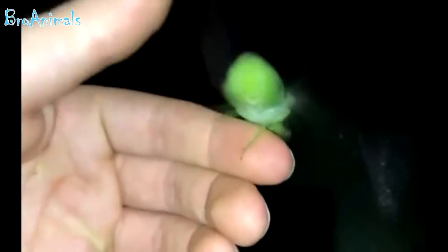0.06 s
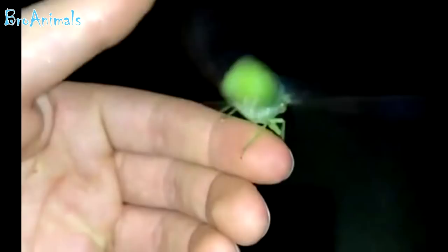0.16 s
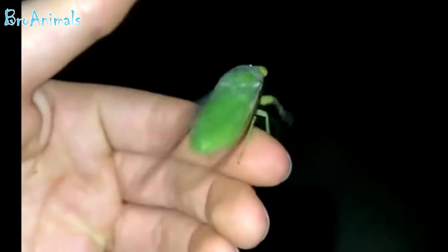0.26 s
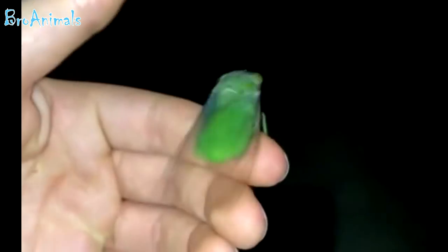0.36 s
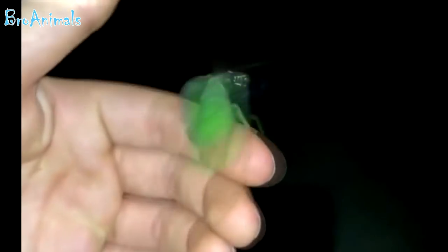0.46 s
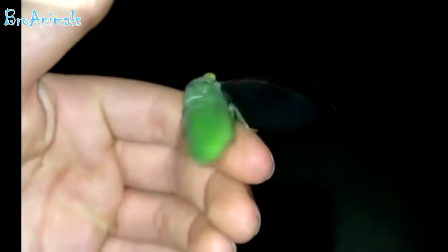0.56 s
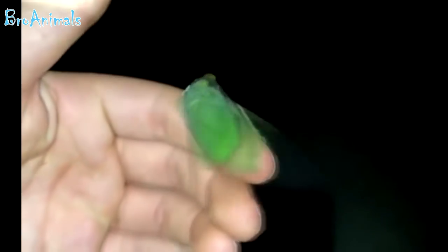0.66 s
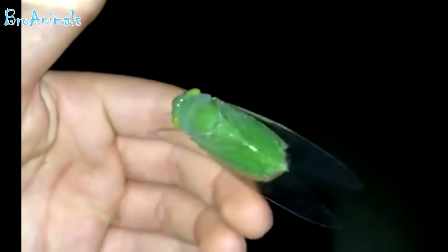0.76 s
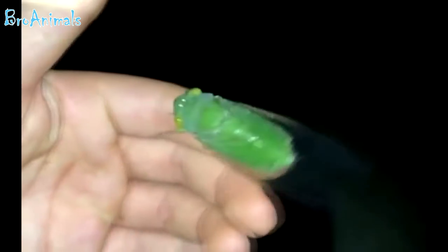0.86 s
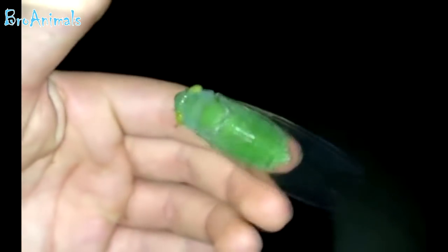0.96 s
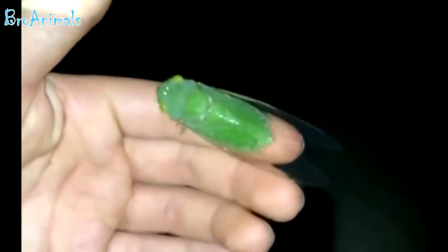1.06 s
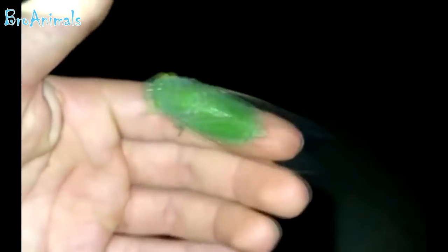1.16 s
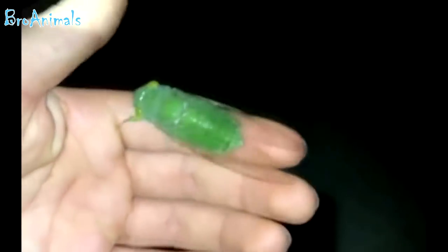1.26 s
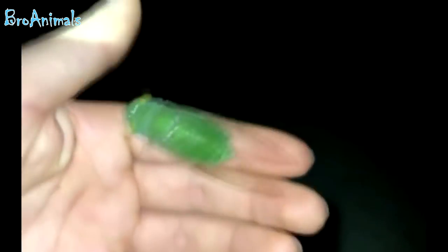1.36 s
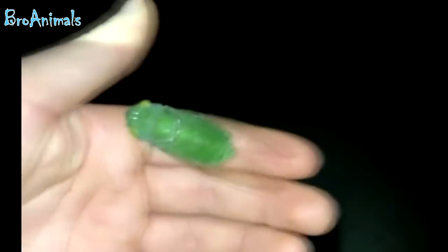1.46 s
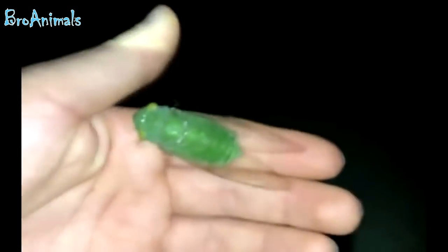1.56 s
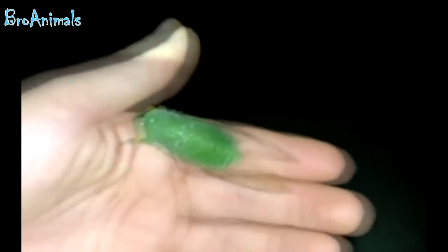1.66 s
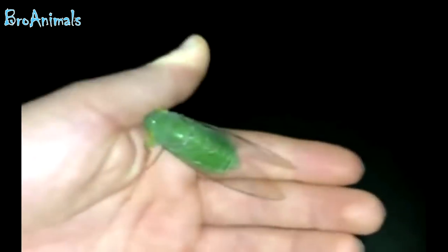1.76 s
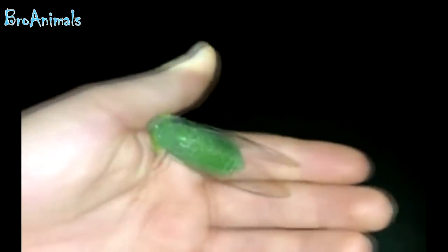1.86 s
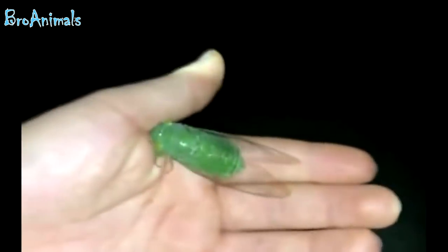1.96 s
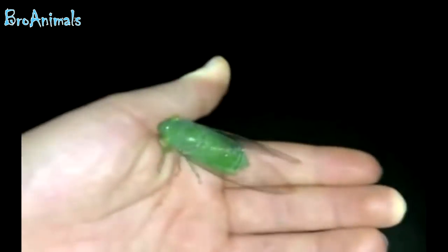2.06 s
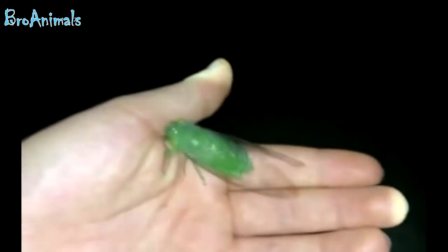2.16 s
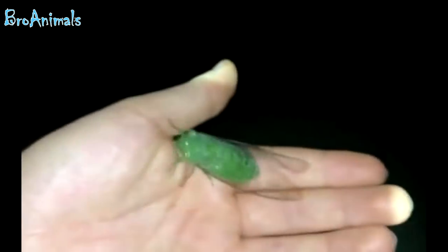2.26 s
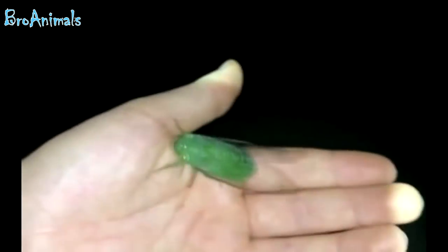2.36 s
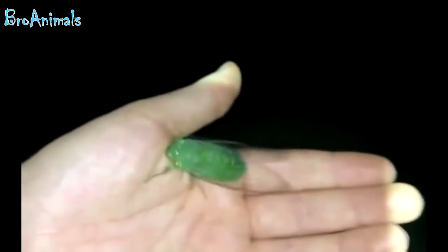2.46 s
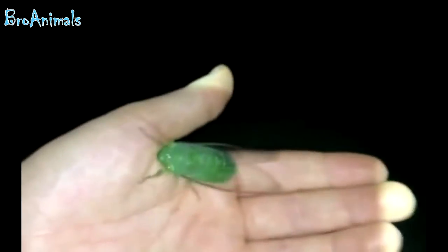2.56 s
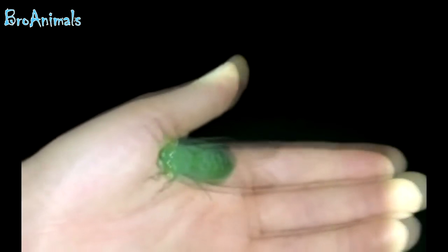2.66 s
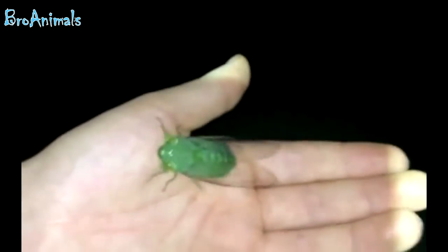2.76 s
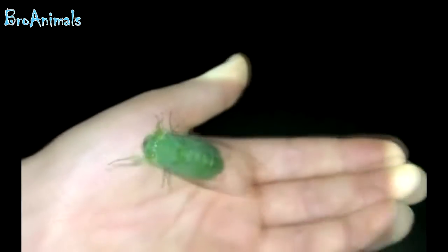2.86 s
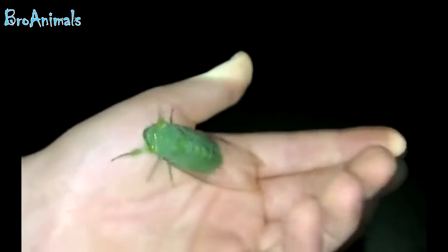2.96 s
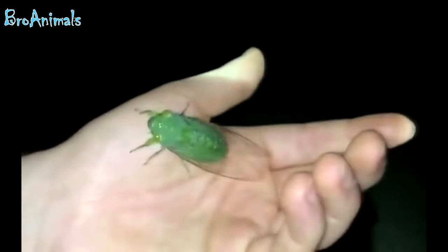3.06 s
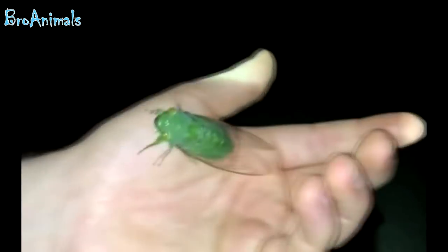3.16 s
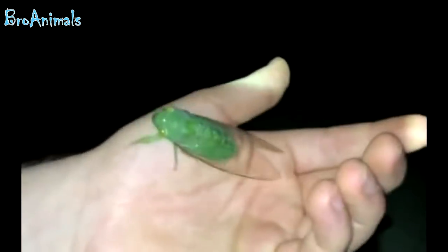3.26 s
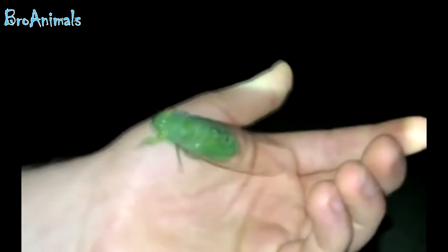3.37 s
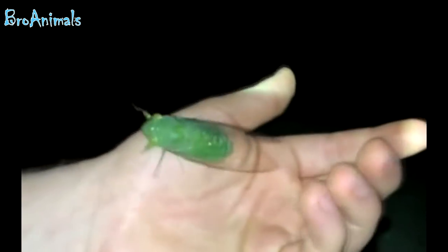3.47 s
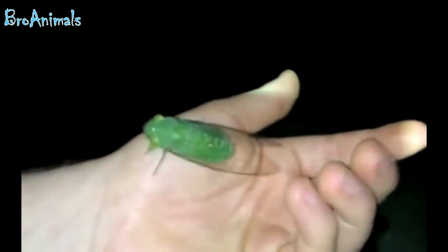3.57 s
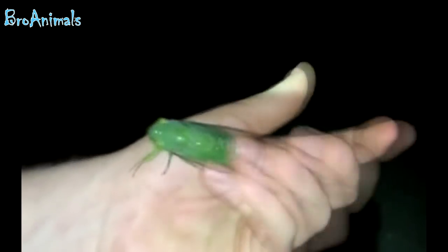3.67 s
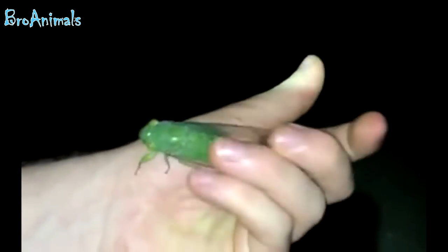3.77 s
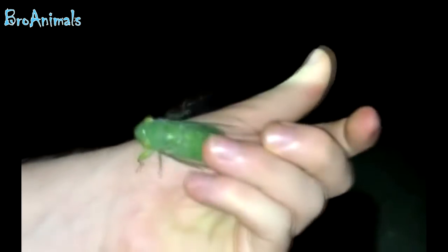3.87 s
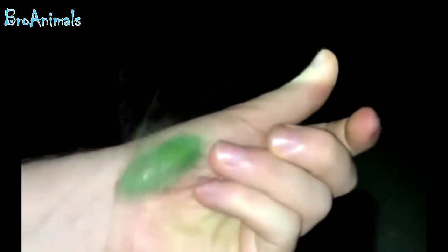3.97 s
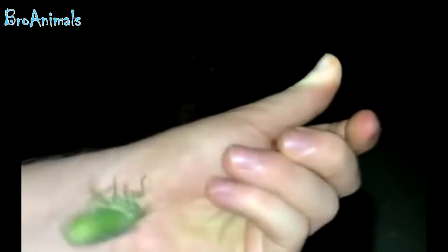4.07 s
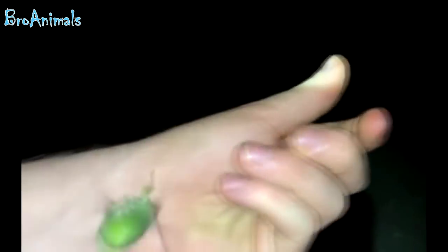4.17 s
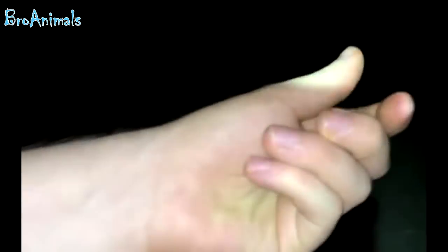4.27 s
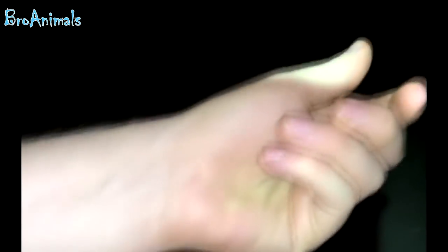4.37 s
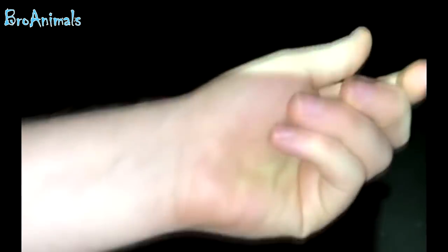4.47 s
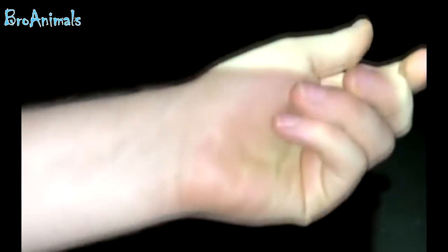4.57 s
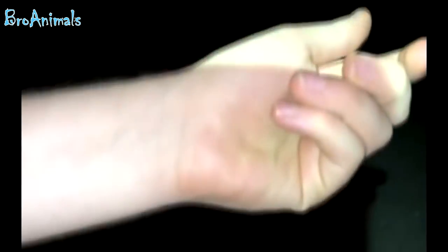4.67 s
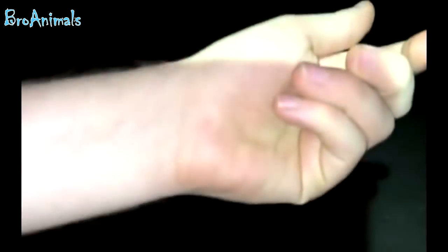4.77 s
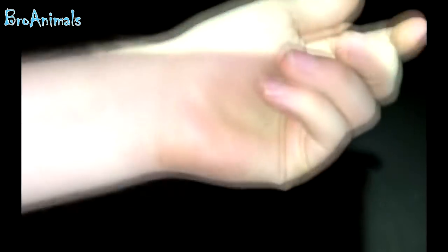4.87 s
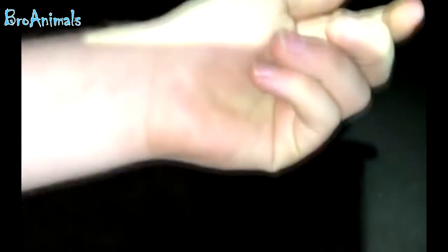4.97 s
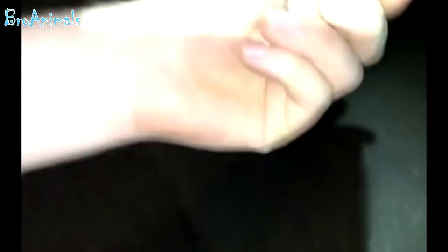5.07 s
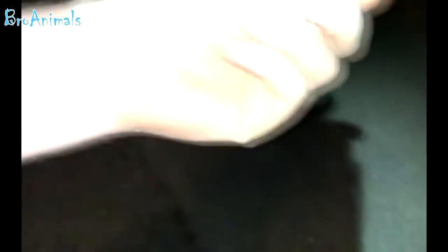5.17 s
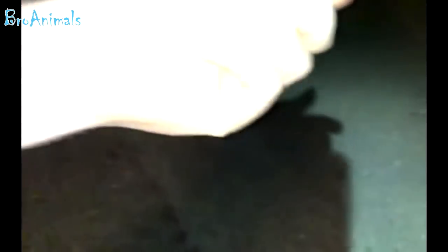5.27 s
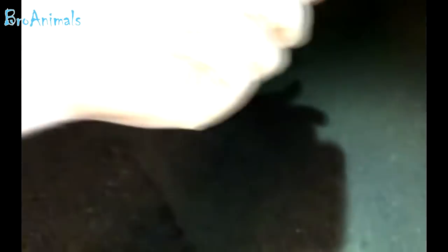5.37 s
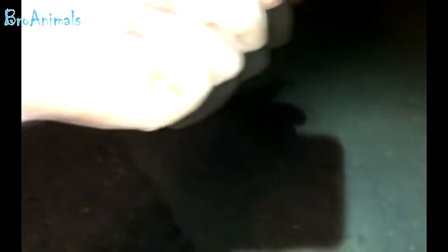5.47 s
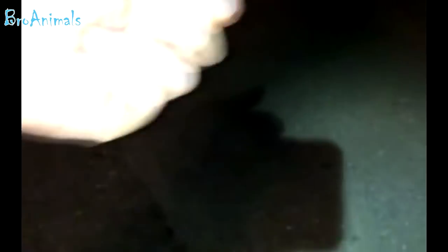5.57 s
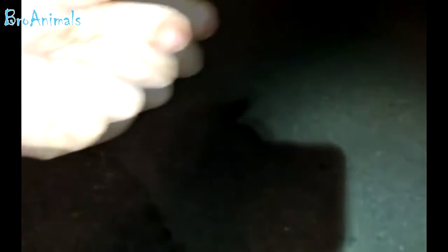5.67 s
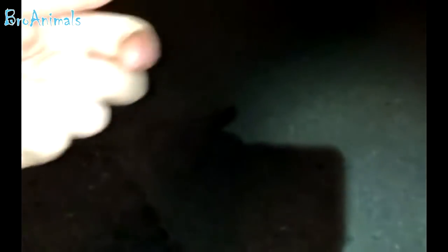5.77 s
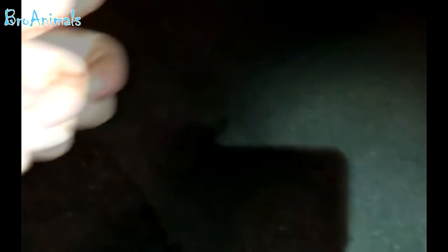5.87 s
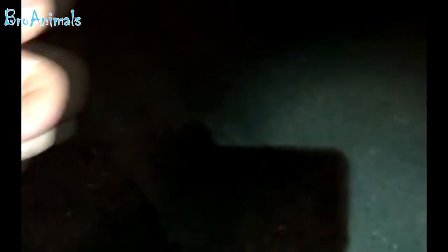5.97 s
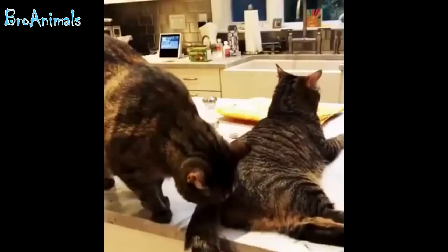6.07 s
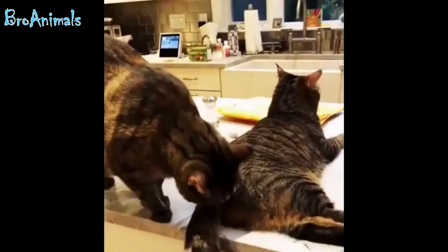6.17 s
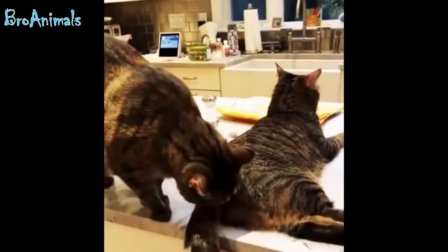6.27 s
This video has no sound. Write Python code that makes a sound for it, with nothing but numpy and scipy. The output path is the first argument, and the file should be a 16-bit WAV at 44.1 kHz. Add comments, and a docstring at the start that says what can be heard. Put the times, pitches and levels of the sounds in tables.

```python
"""Cicada leaving a hand at night

A cicada close to a phone buzzes twice, clicks once, then flies off buzzing. Each pull of a tymbal
muscle pops a row of ribs, and the pops ring abdomen and membranes. Crickets and a far machine hum sit
behind. The night stops dead, and after a short silence an indoor hiss fades in."""
import sys
import numpy as np
from scipy import signal
from scipy.fft import rfft, irfft, next_fast_len
from scipy.io import wavfile
from scipy.ndimage import uniform_filter1d, map_coordinates

SR = 44100
rng = np.random.default_rng(int(sys.argv[2]) if len(sys.argv) > 2 else 0)


def persist_wave(psi):
    """Save psi, clipped to +-1, as 16-bit WAV."""
    counts = np.round(np.clip(psi, -1, 1) * 32767).astype(np.int16)
    wavfile.write(sys.argv[1], SR, np.atleast_2d(counts).T)


N = 278923
T = np.arange(N) / SR
WING_HZ, WING_DEPTH = 43.5, .15
TAKEOFF_S, LEAVES_S, STOP_S, INDOOR_S = 4.0, 4.3, 6.112, 6.284

# pace of the tymbal muscle: (time [s], stroke rate [Hz], pop rate within a stroke [Hz], pop scatter [us])
RHYTHM = [(0, 162, 1000, 24), (.156, 156, 997, 22), (.455, 170, 1015, 30), (.5, 159, 1003, 25),
          (.526, 140, 1003, 25), (1.69, 140, 1050, 25), (3.82, 163, 1090, 45), (3.87, 162.3, 1035, 40),
          (3.95, 160, 1003, 27), (4.0, 157, 998, 18), (4.13, 155, 986, 16), (4.3, 153.6, 979, 14),
          (4.95, 156, 968, 26), (5.066, 162, 1025, 35), (5.19, 160, 940, 30), (5.32, 157.5, 885, 40),
          (5.4, 156, 975, 45), (6.11, 156, 945, 45)]


def cicada():
    """Tymbal strokes ring the body; the colour shifts as the insect strains and turns."""
    # one curve a buzz: (time [s], level [dB], brightness, hollowness, tilt [dB/octave])
    buzzes = [
        [(0.0, -17.5, 1, 0.63, -2), (0.156, -16.5, 0.73, 0.25, 1.1)],
        [(0.455, -17, 0.85, 0.31, -3.5), (0.526, -17, 1, 0.3, -1.7)],
        [(3.836, -28, -1.04, 0.8, -1.5), (3.96, -16, -0.61, -0.32, 0), (4.01, -17, -0.096, 0.39, 1.6),
         (4.2, -15.5, 0.12, 0.4, 0.8), (4.27, -15.5, -.6, 0.01, 1.8), (4.32, -16, -.2, -0.1, 1.4),
         (4.4, -22, -0.64, -0.05, 1.2), (4.5, -24.5, 0.17, 0.12, 0.5), (4.6, -27.5, 0.17, -0.22, 1),
         (4.72, -29, -0.2, -0.37, 2.2), (4.86, -31.5, -0.0038, -0.12, 1.9), (4.957, -34, 0.26, -0.18, 0.6)],
        [(5.08, -36.5, 0.3, 0.067, 3), (5.14, -34.5, 0.29, 0.067, 1.5)],
        [(5.184, -35, 0.35, -0.068, 2.5), (5.26, -38, 0.92, -0.64, -1.5), (5.36, -42, 0.74, -0.27, 2),
         (5.445, -45.5, 0.49, -0.84, -2)],
        [(5.505, -42, 0.73, -0.12, -2), (5.59, -49.5, 0.71, -0.22, 0.5)],
        [(5.69, -54, .4, 0.19, -1.5), (5.79, -46.5, 0.74, -0.28, -1.8), (6.11, -58, 1, -0.011, -1)],
    ]
    # single strokes: (time [s], level [dB], brightness, hollowness, tilt [dB/octave])
    strokes = [(0.162, -14, 0.72, 0.34, 0.1), (0.418, -15, 0.57, 0.31, 0), (0.432, -13.5, 0.91, 0.28, 1.5),
               (0.443, -18, 0.39, 0.14, -3), (1.691, -17.5, 0.41, -0.25, -5),
               (3.819, -19.5, -0.81, 0.9, -3.4), (5.065, -27, -0.49, -0.77, 4.5),
               (5.492, -37.5, .4, .1, -3), (5.623, -51, 1, .2, 2), (5.665, -51, 0.91, 0.42, 2)]
    runs = [muscle_strokes(buzz[0][0], buzz[-1][0]) for buzz in buzzes]
    times = np.concatenate([[row[0] for row in strokes]] + [t for t, _ in runs])
    side_db = np.concatenate([np.zeros(len(strokes))] + [db for _, db in runs])
    rows = np.vstack(buzzes + [strokes])
    at, level_db, bright, hollow, tilt = rows[np.argsort(rows[:, 0])].T
    long_buzz = (T > buzzes[2][0][0]) & (T < buzzes[2][-1][0])
    drive = membrane_rattle(rib_pops(times, side_db))
    body = body_resonance(drive, at, bright, hollow, tilt, long_buzz)
    # in flight the wings shade the sound once a beat
    wings = 1 + WING_DEPTH * (T > TAKEOFF_S) * np.sin(2 * np.pi * WING_HZ * T)
    direct = body * wings * undb(np.interp(T, at, level_db))
    return direct + passing_echo(direct) + wall_tails(direct)


def muscle_strokes(start, end, side_lag_s=.00003, side_db=-1.2):
    """Stroke times and levels of one buzz: the two tymbals alternate, the second late and weaker."""
    t = np.arange(start, end, 1 / SR)
    at, stroke_hz, _, _ = np.transpose(RHYTHM)
    turns = np.cumsum(np.interp(t, at, stroke_hz)) / SR
    stroke = np.arange(int(turns[-1]) + 1)
    side = stroke % 2
    return np.interp(stroke, turns, t) + side_lag_s * side, side_db * side


def rib_pops(times, side_db, jitter_s=.00005, pace_spread=.008, stroke_spread_db=1.3, rib_spread_db=1.8):
    """Each stroke pops a row of ribs, a little uneven in timing and strength."""
    # ribs in the order they pop: (level [dB])
    rib_db = [-9, -2, -1, -1, -4, -9]
    ribs = len(rib_db)
    chance = rng.standard_normal((2000, 3 + 2 * ribs))[:len(times)]
    at, _, pop_hz, scatter_us = np.transpose(RHYTHM)
    onsets = times + jitter_s * chance[:, 0]
    stroke_db = side_db + stroke_spread_db * chance[:, 1]
    pace = np.interp(times, at, pop_hz) * (1 + pace_spread * chance[:, 2])
    scatter = np.interp(times, at, scatter_us)[:, None] * chance[:, 3:3 + ribs] / 1e6
    pop_times = onsets[:, None] + np.arange(ribs) / pace[:, None] + scatter
    pop_db = stroke_db[:, None] + rib_db + rib_spread_db * chance[:, 3 + ribs:]
    return clicks(pop_times, undb(pop_db))


def membrane_rattle(pops, rattle_db=-12, decay_s=.0006):
    """The pops, each trailed by membrane noise and thinned out: a small body radiates no bass."""
    fade = np.exp(-1 / (decay_s * SR))
    envelope = signal.lfilter([np.sqrt(1 - fade ** 2)], [1, -fade], np.abs(pops))
    rattle = undb(rattle_db) * envelope * rng.standard_normal(N)
    return signal.sosfilt(signal.butter(4, 780, "highpass", fs=SR, output="sos"), pops + rattle)


def body_resonance(drive, at, bright, hollow, tilt, long_buzz, pivot_hz=3000, air_hz=12000):
    """Abdomen and membranes ring in bands, each levelled over the long buzz and then coloured."""
    # body resonances: (centre [Hz], width [Hz])
    modes = [(1005, 290), (1350, 350), (2030, 560), (2950, 800), (3830, 800), (4750, 900), (6850, 1400),
             (9000, 2200), (12000, 4000)]
    # their balance: (level [dB], gain per unit of brightness [dB], gain per unit of hollowness [dB])
    balance = [(-10, -2.5, 9.5), (-22, -5.5, 7), (-6.5, -5, -0.5), (-5, 2.7, -6), (-7, 9, 6.5),
               (-18.5, -1.7, 4.5), (-6.5, 3.9, 7.5), (-10.5, 6.7, -0.5), (-16.5, 13, -7.7)]
    body = 0
    for (hz, width), (db, per_bright, per_hollow) in zip(modes, balance):
        mode = ring(ring(drive, hz, width), hz, 3 * width)
        colour_db = db + per_bright * bright + per_hollow * hollow + tilt * np.log2(hz / pivot_hz)
        air_db = away(0, -7) * (hz / air_hz) ** 2  # distance dulls the top
        turning_db = away(1, 3) * walk(26)  # each band wavers as the insect turns
        gain = undb(np.interp(T, at, colour_db) + air_db + turning_db)
        polarity = -1 if hz == modes[0][0] else 1  # the abdomen moves against the membranes
        body += polarity * gain * mode / np.std(mode[long_buzz])
    return body


def passing_echo(direct):
    """A surface that the insect flies past throws back an echo with a sliding delay."""
    # the reflection: (time [s], delay [s], level [dB])
    reflection = [(4.0, 0.00039, -9), (4.2, 0.00038, -6), (4.95, 0.00035, -11.5), (5.07, 0.00083, -10),
                  (5.2, 0.00036, -26), (5.45, 0.00047, -11), (5.7, 0.00039, -10)]
    at, lag, db = np.transpose(reflection)
    echo = map_coordinates(direct, [(T - np.interp(T, at, lag)) * SR], order=3)
    return undb(np.interp(T, at, db)) * echo


def wall_tails(direct, t60_s=.075):
    """Three short echo tails in a shifting mix; they gain on the direct sound as the insect leaves."""
    send = direct * undb(away(-17, -4))
    t = T[:SR // 4]
    out = 0
    for _ in range(3):
        tail = rng.standard_normal(len(t)) * undb(-60 * t / t60_s) * (t > .002)
        out += signal.fftconvolve(send * walk(36), tail / np.linalg.norm(tail))[:N]
    return out / np.sqrt(3)


def wing_flutter():
    """Low puffs of air, one a wing beat."""
    # bursts of beats near the phone: (start [s], length [s], starting level [dB], fall [dB/s])
    bursts = [(0.0, .17, -36, 87), (0.436, .1, -43, 30), (3.947, .28, -49.5, 45), (4.262, .27, -45.5, 56)]
    puffs = noise_band(130, 170) * (1 + np.sin(2 * np.pi * WING_HZ * T))
    gain = sum(undb(db - fall * np.clip(T - start, 0, length)) * (T >= start) * (T < start + length)
               for start, length, db, fall in bursts)
    return unit(puffs) * uniform_filter1d(gain, 400)


def hand_bumps():
    """Hand and air nudge the phone: soft thumps that sag in pitch."""
    # thumps: (start [s], peak [dB], nominal pitch [Hz], length [periods of that pitch])
    thumps = [(0.214, -18.5, 145, 3.1), (3.139, -44, 64.6, 3.1), (4.016, -37, 192, 7.1),
              (4.075, -41, 180, 6.9), (4.155, -40.5, 223, 8.4), (4.377, -40, 91, 5.7),
              (4.465, -39, 83.4, 3.9), (5.916, -37.5, 156, 9.6), (6.097, -38, 169.8, 5.5)]
    out = np.zeros(N)
    for start, db, hz, periods in thumps:
        progress = np.clip((T - start) * hz / periods, 0, 1)
        envelope = np.sin(np.pi * progress ** .3) ** 2
        out += undb(db) * envelope * np.sin(2 * np.pi * periods * (1.49 * progress - progress ** 2))
    return out


def cricket_calls(hz=10250, width_hz=500, call_s=.115, every_s=.283):
    """One high cricket sings phrases of evenly spaced chirps."""
    # phrases: (start [s], calls [count], level [dB])
    phrases = [(.8, 8, -57), (3.19, 3, -56), (5.45, 3, -57)]
    envelope = sum(undb(db) * np.sin(np.pi * np.clip((T - start - k * every_s) / call_s, 0, 1))
                   for start, count, db in phrases for k in range(count))
    return envelope * noise_band(hz, width_hz)


def cricket_trill(hz=4290, width_hz=150, level_db=-63.5, swell_db=.9, dip_db=-1):
    """A lower cricket trills without a break, easing off slightly for a moment."""
    dip = (T > 3.7) & (T < 5.2)
    return undb(level_db + swell_db * walk(5) + dip_db * dip) * noise_band(hz, width_hz)


def cricket_chorus(bed_db=-49, flicker_db=1.14, swell_db=.5):
    """A flickering bed of night air and crickets, with single singers swelling in it."""
    # spectrum of the bed: (frequency [Hz], relative density [dB])
    spectrum = [(15, -59), (30, -39), (60, -10.5), (150, -1.5), (260, -7), (750, -12.5), (1200, -14.5),
                (3700, -20), (5700, -20.5), (6600, -18), (8400, -8), (9400, -17.5), (11200, -24),
                (16000, -39)]
    # single singers: (centre [Hz], width [Hz], level [dB])
    singers = [(2850, 600, -69), (6830, 870, -58), (7600, 730, -80), (8070, 370, -63.5), (8500, 270, -75.5),
               (8780, 250, -62.5)]
    out = undb(bed_db + flicker_db * walk(60)) * coloured(spectrum)
    for hz, width, db in singers:
        out += undb(db + swell_db * walk(7.6)) * noise_band(hz, width)
    return out


def machine_hum():
    """A far machine drones in low tones that waver in pitch."""
    # hum tones: (pitch [Hz], width of the waver [Hz], rms level [dB])
    tones = [(76.7, 4, -54), (193.2, 3.3, -56), (99.6, 8, -61), (50.7, 8, -64), (156, 10, -68.5)]
    out = 0
    for hz, width, db in tones:
        pitch = hz + width / 4 * walk(6.2)
        out += undb(db) * np.sqrt(2) * np.sin(2 * np.pi * np.cumsum(pitch) / SR)
    return out


def indoor_hiss(level_db=-29, floor_db=-98.5, rise_s=.04):
    """Steady room noise fades up out of near silence."""
    # spectrum of the hiss: (frequency [Hz], relative density [dB])
    spectrum = [(29, -77), (50, -40), (398, 0), (646, -15), (1360, -8.5), (2320, -15), (5150, -11),
                (16000, -28)]
    rise = np.maximum(T - INDOOR_S, 0) / rise_s
    return coloured(spectrum) * (undb(level_db) * rise ** 2 / (1 + rise ** 2) + undb(floor_db))


def away(near_db, far_db, glide_s=.8):
    """Glides from the near value towards the far one as the insect flies off."""
    return far_db + (near_db - far_db) * np.exp(-np.maximum(T - LEAVES_S, 0) / glide_s)


def ring(x, hz, width_hz, order=1):
    """Band-pass; at order 1 a single resonance that starts at once, then rings out."""
    edges = np.clip([hz - width_hz / 2, hz + width_hz / 2], 10, SR * .45)
    return signal.sosfilt(signal.butter(order, edges, "bandpass", fs=SR, output="sos"), x)


def noise_band(hz, width_hz):
    """A band of noise, rms 1."""
    return unit(ring(rng.standard_normal(N), hz, width_hz, order=2))


def coloured(spectrum):
    """Noise shaped by (frequency [Hz], level [dB]) points, rms 1."""
    hz, db = np.transpose(spectrum)
    size = next_fast_len(N)
    freqs = np.maximum(np.arange(size // 2 + 1) * SR / size, 1)
    gain = undb(np.interp(np.log(freqs), np.log(hz), db))
    return unit(irfft(rfft(rng.standard_normal(size)) * gain, size)[:N])


def clicks(times, sizes):
    """Impulses placed between samples, each a short windowed sinc."""
    at = times.ravel()[:, None] * SR
    index = np.floor(at).astype(int) + np.arange(-7, 9)
    shape = np.sinc(index - at) * np.cos(np.pi * (index - at) / 16) ** 2
    return np.bincount(np.clip(index, 0, N - 1).ravel(), (sizes.reshape(-1, 1) * shape).ravel(), N)


def walk(rate_hz):
    """Smooth random drift, rms 1."""
    span = int(SR / rate_hz)
    return unit(uniform_filter1d(uniform_filter1d(rng.standard_normal(N), span), span))


def undb(db):
    return 10 ** (np.asarray(db) / 20)


def unit(x):
    return x / np.sqrt(np.mean(x ** 2))


def scene():
    """The night cuts off and the indoor hiss follows, alike in both channels."""
    close = cicada() + wing_flutter() + hand_bumps()
    behind = cricket_chorus() + machine_hum() + cricket_trill() + cricket_calls()
    # a soft, low whoosh lies under the opening and dies away around 1.8 s
    whoosh = undb(-55) * (1 - np.tanh((T - 1.8) / .06)) / 2 * noise_band(hz=543, width_hz=620)
    cut = np.clip((STOP_S - T) / .00083, 0, 1)
    return np.tile((close + behind + whoosh) * cut + indoor_hiss(), (2, 1))


def record(dry, top_hz=15850):
    """The phone rounds the loudest peaks and cuts the top."""
    rounded = np.tanh(1.05 * dry) / 1.05
    return signal.sosfilt(signal.ellip(10, .2, 60, top_hz, fs=SR, output="sos"), rounded)


dry = scene()
out = record(dry)
persist_wave(out)
```